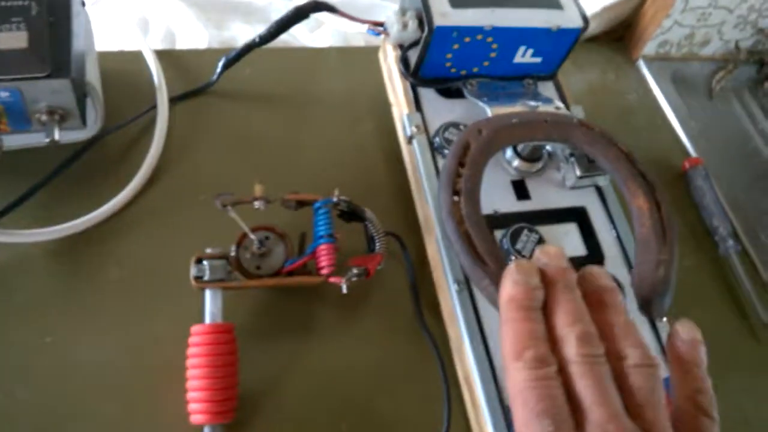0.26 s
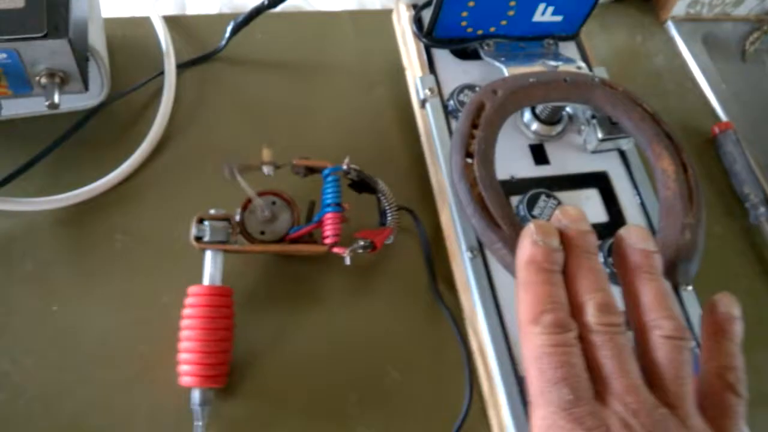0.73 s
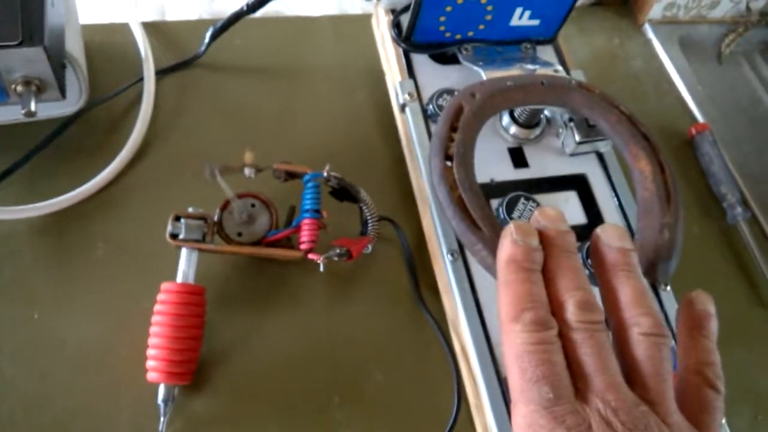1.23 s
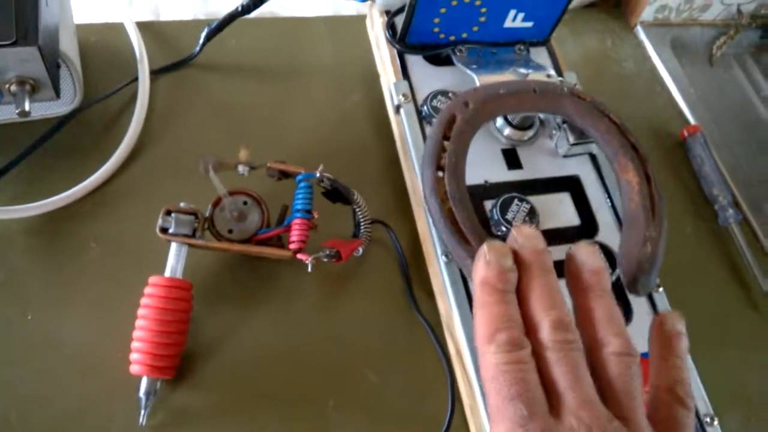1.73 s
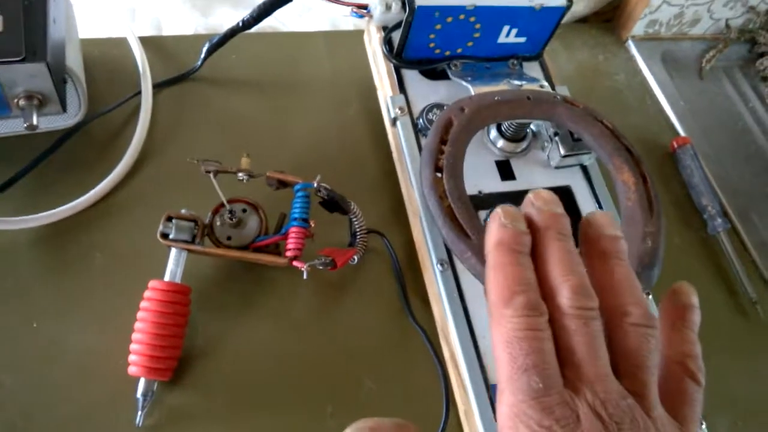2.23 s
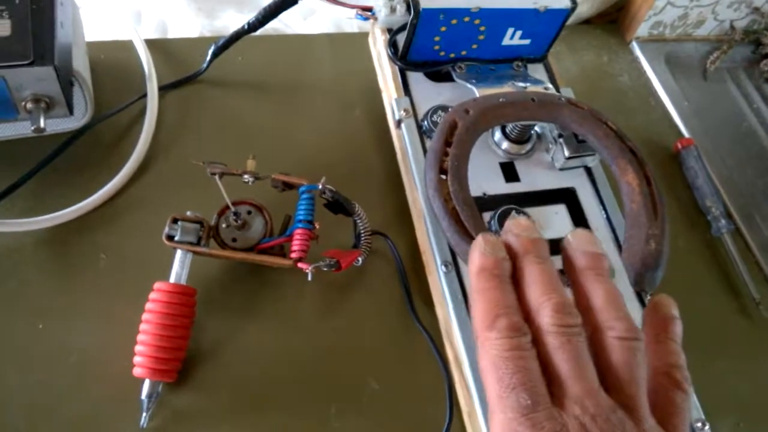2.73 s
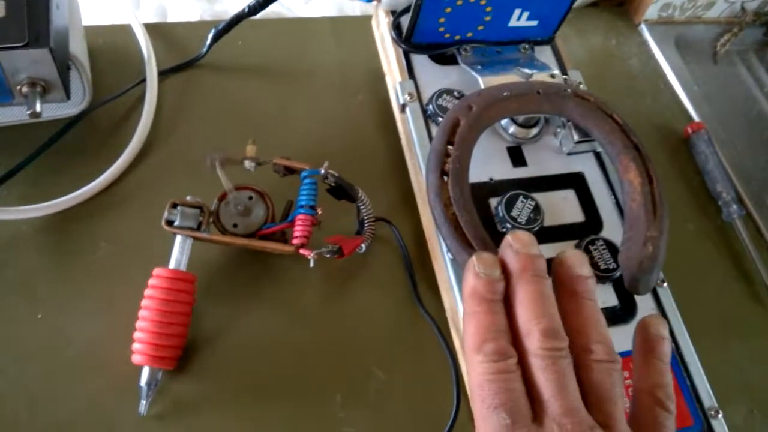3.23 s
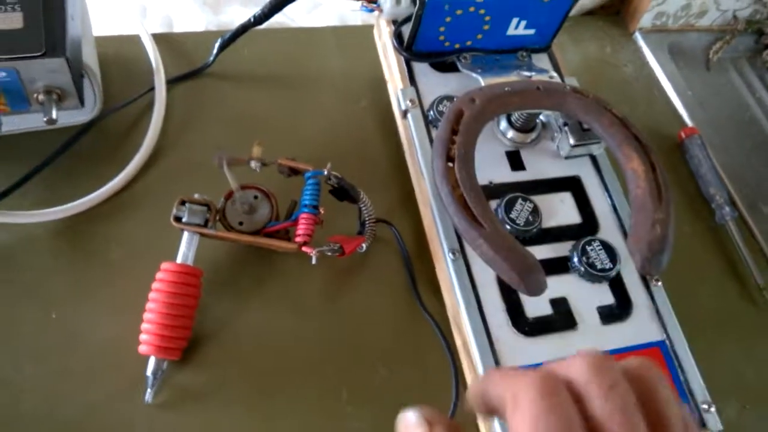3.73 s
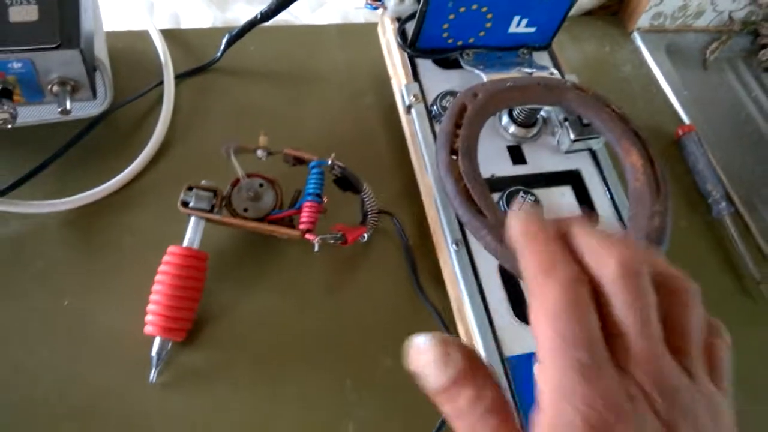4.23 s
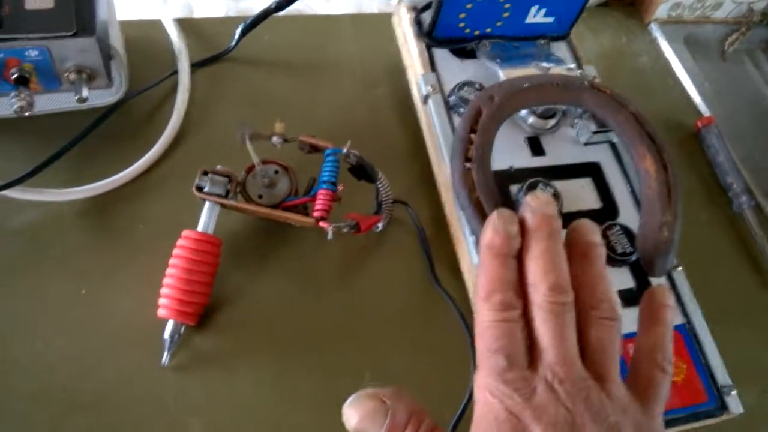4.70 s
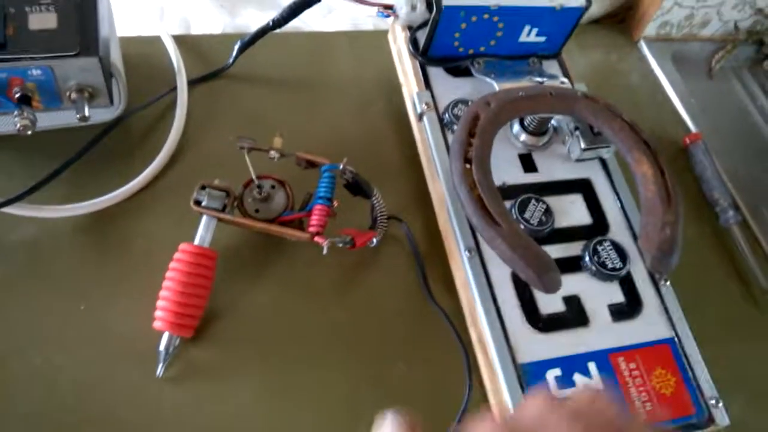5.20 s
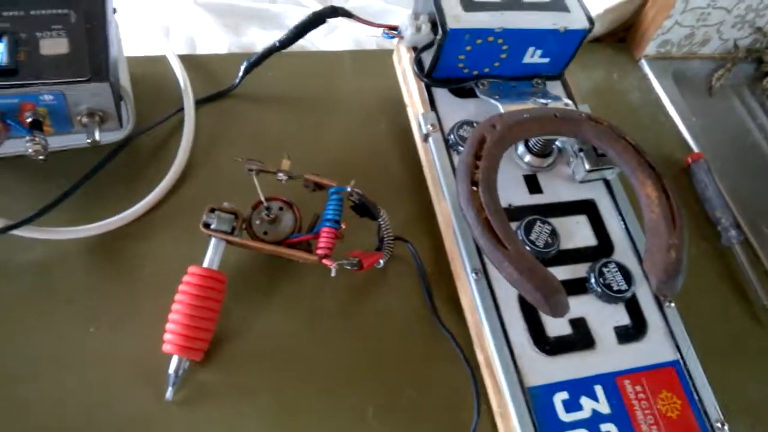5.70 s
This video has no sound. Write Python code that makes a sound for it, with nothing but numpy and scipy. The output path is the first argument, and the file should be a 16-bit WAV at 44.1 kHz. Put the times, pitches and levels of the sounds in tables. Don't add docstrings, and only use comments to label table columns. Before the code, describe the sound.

Twice a pedal clicks and a little motor tool rattles in a low, rough drone against a tabletop, coasts to rest, then small ticks follow.

```python
import sys
import numpy as np
from scipy import signal
from scipy.io import wavfile
from scipy.ndimage import uniform_filter1d

SR = 44100
rng = np.random.default_rng(int(sys.argv[2]) if len(sys.argv) > 2 else 0)


def waveform_to_disk(signal):
    frames = np.transpose(np.atleast_2d(signal))
    scaled = np.clip(frames, -1, 1) * 32767
    samples = np.round(scaled).astype(np.int16)
    wavfile.write(sys.argv[1], SR, samples)


def natural_amplitude(level_db):
    exponent = np.asarray(level_db, float) / 20
    return 10 ** exponent


N = 262395
TIME = np.arange(N) / SR

# (switch-on [s], crank grips [s], switch-off [s], full speed [turns/s]); turn 0 is the grip
PRESSES = [
    (.375, .4714, 2.02, 37.975),
    (3.064, 3.1546, 4.915, 38.01),
]
# (share of turn [1], level [dB], softness [Hz])
TOUCHES = [
    (0, 0, 560),
    (.30, -13, 450),
    (.60, -10, 350),
    (.78, -14, 350),
]
# (from [s], to [s], accent every [turns], accented turn early [ms], accent [dB])
SPELLS = [
    (.74, 1.3, 2, 2.4, 3.2),
    (1.3, 1.5, 2, 1.6, 2),
    (1.5, 2.1, 2, 0, .8),
    (3.25, 3.78, 2, 0, 1.5),
    (3.78, 4.42, 2, 0, .3),
    (3.76, 4.43, 4, 0, 2.5),
]
# (time [s], edge peak [dB], thud [dB])
STANDOUT_BLOWS = [(0.434, -40, -23.5), (0.471, -30, -40), (0.495, -24.5, -22), (0.524, -24, -28),
                  (0.552, -24, -30.5), (0.628, -35, -19.5), (0.68, -33, -18), (0.708, -33, -30),
                  (0.732, -33, -20.5), (1.31, -33.5, -20.5), (1.363, -35, -25), (1.414, -33, -21),
                  (1.467, -33, -25.5), (1.523, -34, -22), (1.573, -32, -22), (1.603, -32, -24),
                  (1.627, -28, -21.5), (1.679, -29, -24), (1.732, -29.5, -21.5), (1.839, -29, -22),
                  (1.891, -31, -21.5), (1.945, -31, -23.5), (1.996, -30.5, -32), (2.055, -40, -25.5),
                  (2.092, -33, -2), (3.209, -30, -17.5), (3.233, -30, -21), (3.336, -31, -25),
                  (3.363, -27.5, -23), (3.418, -28, -22), (3.47, -29, -21), (3.521, -27.5, -24),
                  (3.575, -32, -22), (3.629, -27.5, -25.5), (3.652, -27, -23), (3.679, -28, -24),
                  (3.731, -32, -21), (3.812, -30, -30), (3.837, -24.5, -23), (3.89, -30.5, -21),
                  (3.995, -24, -21.5), (4.099, -34, -20), (4.181, -23, -23), (4.205, -19, 8),
                  (4.287, -32, -28.5), (4.362, -30, -21.5), (4.416, -31, -9), (4.47, -27, -36.5),
                  (4.495, -26, -24), (4.575, -30, -32), (4.6, -30, -22), (4.627, -29, -33),
                  (4.654, -31, -30), (4.704, -28, -21.5), (4.758, -28.5, -26.5), (4.812, -29.5, -49),
                  (4.888, -28.5, -27.5), (4.914, -30, -21.5), (4.943, -31, -19)]
# (time [s], boom [dB], lower board modes [dB])
BEARING = [
    [(.55, -29.5, 1.5), (.75, -30, 4), (.95, -32, -6), (1.25, -32.5, -3.5), (1.4, -30.5, -4),
     (1.6, -28, 1.5), (1.8, -28.5, 0), (1.97, -29.5, 0)],
    [(3.25, -28.5, 3.5), (3.5, -27, 1.5), (3.75, -28, 4), (4.0, -28, 5.5), (4.25, -28.5, 6), (4.45, -29, 1),
     (4.65, -30.5, -1), (4.8, -27.5, 0), (4.9, -30, 3.5)],
]
# (share of full speed [1], boom [dB], knock [dB], rattle [dB])
SPEED_LAW = [(.11, -74, -58, -63), (.25, -43, -75, -36), (.42, -5, -39, -13), (.58, -7, -5.5, -5),
             (.72, 2.1, -2, -2.5), (1.0, -0.5, -0.5, 0.5)]
# (duration [s], from level [dB])
BUILD_UP = [(0.078, -20.5), (0.039, -47), (0.064, -8.5)]
# (frequency [Hz], width [Hz], level [dB])
BOOM_MODES = [(83, 4.4, 5), (107.5, 9.2, 1), (166.6, 1.4, -1), (219, 36, 0.5), (247, 3.9, 5),
              (292.7, 12, 3), (390.8, 24, -9.5), (450, 10, -34), (133.4, 55, 1), (557, 88, -7)]
# (frequency [Hz], width [Hz], level [dB])
KNOCK_MODES = [(656, 37, -9.5), (861.6, 55, -0.5), (1046, 19, -6.5), (1198, 83, -2), (1519, 24, -3.5),
               (1618, 30, -2), (1730, 77, -7), (1866, 21, -3), (2016, 26, -22)]
# (frequency [Hz], width [Hz], level [dB])
SWAY_MODES = [(166.5, 24.6, 7), (257, 43, -34), (303, 8.9, -27), (464, 36, -8.5)]
# (frequency [Hz], width [Hz], level [dB])
FRAME_MODES = [(2180, 350, 14), (2476, 30, 18.5), (2800, 380, 15.5), (3050, 770, 10.5), (4040, 1350, 4.5),
               (5120, 410, 6), (5595, 167, 11), (6150, 45, 17.5), (6840, 730, 12.5), (7460, 126, 17),
               (7990, 280, 8.5), (8440, 210, 6), (9080, 990, 2), (12320, 140, 4), (15600, 1100, -9)]
# (share of turn [1], level [dB])
CROWDING = [(0, 2.5), (.15, 2), (.3, 0), (.45, -1.5), (.58, 1), (.7, -1), (.85, .5), (1, 2.5)]
# (multiple of crank speed [1], level [dB])
GEAR_TONES = [(63, -62), (73, -70)]
# (time [s], peak [dB])
HAND_THUMP = [(0.328, -51)]
# (time [s], peak [dB], low ring [Hz], high ring [Hz], low share [dB])
TICKS = [(0.3753, -35, 2290, 6900, -26), (2.146, -48, 1680, 6900, -22), (3.065, -35.5, 4240, 7600, -12),
         (5.039, -42, 3050, 6500, -5), (5.8126, -33.5, 2140, 9200, 8), (5.8264, -50, 9000, 11500, 0),
         (5.8375, -37, 3670, 6200, -2), (5.8373, -32.5, 3650, 6200, 2), (5.862, -58, 2000, 3500, 6),
         (5.901, -55, 2320, 7000, -14), (5.9374, -53, 1580, 7260, -18)]
# (time [s], peak [dB], length [s])
SCRAPES = [(0.404, -54.5, 0.019), (0.593, -55, 0.021), (1.798, -60, 0.03), (2.013, -60, 0.026),
           (3.11, -58.5, 0.013), (3.333, -57, 0.028), (4.716, -102, 0.03), (4.923, -52, 0.017)]
# (time [s], level [dB], length [s], frequency [Hz])
LOADS = [
    (.5, -45, 0.09, 85),
    (2.15, -51.5, 0.1, 103),
    (5.05, -54, 0.08, 126),
    (5.84, -70, .1, 74),
]
# (time [s], level [dB], length [s], frequency [Hz])
SQUEAKS = [(2.97, -78, .07, 4850), (5.125, -79, 0.07, 4850), (5.89, -82, 0.05, 4950),
           (5.04, -71, 0.1, 3000), (2.19, -74, .07, 2350)]
# (time [s], level [dB], length [s], frequency [Hz])
AFTERSHOCKS = [(2.12, -45, 0.015, 284), (2.155, -52, 0.03, 450), (2.19, -55.5, 0.019, 430),
               (2.19, -49, 0.07, 158), (2.26, -70, 0.033, 450), (5.025, -42, 0.028, 444),
               (5.05, -41, 0.026, 193), (5.045, -56, .015, 810), (5.11, -63, 0.028, 353),
               (5.15, -64, 0.036, 450), (5.22, -70, 0.027, 493)]
# (frequency [Hz], level [dB])
ROOM_SPECTRUM = [(12, -41), (20, -12.5), (65, -8), (326, -29), (510, -31.5), (713, -33.5), (1020, -32),
                 (1950, -34), (2880, -37), (3700, -38.5), (15800, -44.5)]

ROOM_DB = -61.5
KNOCK_DB, KNOCK_FOLLOWS, RATTLE_DB = -42, 0.2, -47.5
LABOUR_SHARE, COAST_S, COAST_OUT_S = .71, .135, .29
SPELL_EDGE_S, FREE_DB, SETTLING = .12, 2.0, .38
SLOW_GATE_DB, SLOW_GATE_TURN = 8.5, 0.28
BLOW_LEAD_S, LANDING_LEAD_S = .001, .0027
STRIKE_LAG_S, SETTLE_LAG_S, SETTLE_S = .001, (.0008, .0018), .3
LANDING_DB, LANDING_PER_ACCENT, LANDING_PER_THUD = -11, 3.56, 2.4
SLAM_DB = -2
EDGE_AT_DB, THUD_AT_DB, BLOW_DELAY_S = -24.5, -21.5, 0.00086
WEAK_THUD_DB = -6
CHATTER_S, CHATTER_DB = 0.003986, -7.5
ROCK_S, ROCK_DB, SLOW_ROCK_DB, ROCK_FREEDOM = 0.003904, -22, 10.5, 4.53
HUM_HZ, HUM_WIDTH_HZ, HUM_DB = 270.4, 53, -10.5
THUD_DB, SHAKE_DB = -6, -6
PATCHY_DB, PATCHY_HZ = 1.2, 9
TICK_TAIL_DB, TICK_T60_S = -24, 0.12
RELEASE_DB, RELEASE_S = -48.5, 0.033


def machine():
    angle, (boom_db, knock_db, rattle_db) = running_state()
    dull, sharp = table_blows()
    running = natural_amplitude(rattle_db + 48)
    shake = rng.standard_normal(N) * np.sqrt(running)
    hardness = natural_amplitude(np.clip(knock_db - boom_db + 14, -12, 2))
    boom = table_boom(dull, shake, running, hardness)
    knock = butter(body(sharp + natural_amplitude(SHAKE_DB) * sharp.std() * shake, KNOCK_MODES), 550, "high")
    mesh = gear_tones(angle, running)
    rattle = frame_rattle(angle)
    return levelled(boom, boom_db) + levelled(knock, knock_db) + levelled(rattle, rattle_db) + mesh


def crank(on, grip, off, full):
    s = TIME[(TIME >= on) & (TIME < off + COAST_OUT_S)]
    coast = np.exp(-np.maximum(s - off, 0) / COAST_S)
    driven = np.where(s < grip, LABOUR_SHARE, 1) * (np.minimum(s, off) - grip)
    turns = full * (driven + COAST_S * (1 - coast))
    return s, turns, np.where(s < grip, LABOUR_SHARE, coast)


def running_state():
    angle, levels = np.zeros(N), np.full((3, N), -120.)
    share, *law = np.transpose(SPEED_LAW)
    for press, bearing in zip(PRESSES, BEARING):
        s, done, speed = crank(*press)
        here = np.round(s * SR).astype(int)
        speed = uniform_filter1d(speed, size=900, mode="nearest")
        boom_db = np.interp(s, *np.transpose(bearing)[:2])
        knock_db = KNOCK_DB + KNOCK_FOLLOWS * (boom_db - boom_db.mean())
        full_db = boom_db, knock_db, RATTLE_DB
        angle[here] = done
        for k, (rise, from_db) in enumerate(BUILD_UP):
            growth_db = from_db * np.clip(1 - (s - s[0]) / rise, 0, 1)
            levels[k, here] = full_db[k] + np.interp(speed, share, law[k]) + growth_db
        gate = np.cos(2 * np.pi * (done - SLOW_GATE_TURN))
        levels[2, here] += SLOW_GATE_DB * (s > press[2]) * (1 - speed) * gate
    return angle, levels


def table_blows():
    dull, sharp = np.zeros((2, N))
    for press, settle in zip(PRESSES, SETTLE_LAG_S):
        s, done, speed = crank(*press)
        turn = np.arange(np.ceil(done[0]), done[-1] - 1e-3)
        turn_s = np.interp(turn, done, s)
        early_ms, accent_db, uneven_db = bounce(turn, turn_s)
        slow = 1 - np.interp(turn, done, speed)
        listed, listed_s, edge_db, thud_db = standouts(turn_s)
        luck = rng.standard_normal((len(turn), len(TOUCHES), 7))
        for k, (share, db, soft_hz) in enumerate(TOUCHES):
            lead = k < 2
            slip_ms = lead * uneven_db * luck[:, k, 0] / 20
            at = np.interp(turn + share, done, s) + 1e-3 * slip_ms
            at = at + STRIKE_LAG_S + settle * np.exp(-np.maximum(at - press[1], 0) / SETTLE_S)
            size = natural_amplitude(db + 1.6 * uneven_db * luck[:, k, 1]) * (turn + share < done[-1])
            if k == 0:
                free_db = LANDING_DB + LANDING_PER_ACCENT * accent_db + 2.3 * uneven_db * luck[:, 1, 3]
                weight = natural_amplitude(np.minimum(np.where(listed, LANDING_PER_THUD * thud_db, free_db), 3))
                dull += landing(at, early_ms, weight)
                size = size * natural_amplitude(-1.1 * early_ms - 0.78 * np.abs(accent_db) * (early_ms == 0))
                size = size * natural_amplitude(listed * np.minimum(thud_db - WEAK_THUD_DB, 0))
            thud_s = at - BLOW_LEAD_S
            dull += butter(clicks(thud_s, size), soft_hz, "low") * 900 / soft_hz
            freedom_db = uneven_db * (ROCK_FREEDOM + 2.0 * luck[:, k, 6])
            rock = lead * size * natural_amplitude(np.minimum(ROCK_DB + SLOW_ROCK_DB * slow + freedom_db, 1))
            for swing in (1, 2):
                dull += butter(clicks(thud_s + swing * ROCK_S, rock / swing), 378, "low") * 6.8
            size = size * natural_amplitude(-18 * slow)
            if k == 0:
                sharp += butter(clicks((listed_s + at - .001) / 2, listed * natural_amplitude(edge_db + 10.0)), 1000, "low")
                size = np.where(listed, natural_amplitude(edge_db - 60), size * natural_amplitude(-1.0))
            catch_db = 2 * (k > 0) - 1.2 * early_ms + (1 + .7 * uneven_db) * luck[:, k, 2]
            sharp += butter(clicks(at + 2e-4 * luck[:, k, 3], size * natural_amplitude(catch_db)), 1100, "low")
            again = at + CHATTER_S * (1 + 0.13 * luck[:, k, 4])
            sharp += butter(clicks(again, size * natural_amplitude(CHATTER_DB + 3.6 * luck[:, k, 5])), 1200, "low")
    return dull, sharp


def landing(at, early_ms, weight):
    lands = at - BLOW_LEAD_S - LANDING_LEAD_S - 1e-3 * early_ms
    recoil = clicks(lands + 0.0014, weight * natural_amplitude(SLAM_DB - 2.0 * early_ms))
    return butter(clicks(lands, weight) - recoil, 420, "low") * 1.75


def bounce(turn, at):
    early_ms, accent_db, held_db = np.zeros((3, len(turn)))
    for start, end, every, ms, db in SPELLS:
        inside = np.clip(np.minimum(at - start, end - at) / SPELL_EDGE_S + .5, 0, 1)
        marked = turn % every == 0
        early_ms += inside * ms * marked
        accent_db += inside * db * np.where(marked, 1, -1 / (every - 1))
        held_db += inside * db
    return early_ms, accent_db, FREE_DB - SETTLING * held_db


def standouts(at):
    s, edge_db, thud_db = np.transpose(STANDOUT_BLOWS)
    contact_s = s + BLOW_DELAY_S
    near = np.abs(at[:, None] - contact_s).argmin(axis=1)
    listed = np.abs(at - contact_s[near]) < .009
    return listed, contact_s[near], edge_db[near] - EDGE_AT_DB, thud_db[near] - THUD_AT_DB


def table_boom(dull, shake, running, hardness):
    ringing = rms_one(body(dull + natural_amplitude(-8) * dull.std() * shake, BOOM_MODES, sign=1))
    ringing = ringing + natural_amplitude(HUM_DB) * rms_one(resonate(dull, HUM_HZ, HUM_WIDTH_HZ))
    sway_noise = 2 * dull.std() * running ** 0.097 * rng.standard_normal(N)
    sway = rms_one(body(dull + sway_noise, SWAY_MODES))
    thud = rms_one(butter(dull, [200, 560], "band"))
    boom = np.sqrt(hardness) * ringing + natural_amplitude(THUD_DB) * hardness * thud + natural_amplitude(-8) * sway / np.sqrt(hardness)
    boom = butter(boom, [48, 680], "band")
    s, _, lower_db = np.transpose(BEARING[0] + BEARING[1])
    bearing_gain = natural_amplitude(np.interp(TIME, s, lower_db))
    return boom + (bearing_gain - 1) * resonate(boom, 222, 87)


def frame_rattle(angle, looped_db=-0.5, grains_per_s=7000, spread_db=5.5):
    shares, out = rng.random(40), np.zeros(N)
    crowd = natural_amplitude(np.interp(angle % 1, *np.transpose(CROWDING)))
    for modes in (FRAME_MODES[:4], FRAME_MODES[4:8], FRAME_MODES[8:11], FRAME_MODES[11:]):
        contact_db = 3 * rng.standard_normal(40)
        looped = np.zeros(N)
        for press in PRESSES:
            s, done, _ = crank(*press)
            where = np.arange(np.floor(done[0]), done[-1])[:, None] + shares
            luck = rng.standard_normal((2,) + where.shape)
            moving = (where > done[0]) * (where < done[-1])
            at = np.interp(where, done, s) + 5e-5 * luck[0]
            looped += clicks(at, natural_amplitude(contact_db + 1.0 * luck[1]) * moving)
        grain_db = np.clip(spread_db, 0, 3) * np.minimum(rng.exponential(1, N), 4)
        sizes = natural_amplitude(grain_db) * rng.choice([-1, 1], N)
        loose = (rng.random(N) < grains_per_s / SR) * sizes
        patches = natural_amplitude(PATCHY_DB * rms_one(butter(rng.standard_normal(N), PATCHY_HZ, "low")))
        out += body(patches * crowd * (natural_amplitude(looped_db) * rms_one(looped) + rms_one(loose)), modes)
    return out


def gear_tones(angle, running):
    wobble = rms_one(butter(rng.standard_normal(N), 0.49, "low", order=1))
    return sum(natural_amplitude(db + 3) * running * np.sin(2 * np.pi * k * angle + wobble) for k, db in GEAR_TONES)


def pedal():
    out = contact_ticks() + pedal_friction()
    out += swells(LOADS, cycles=1.07) + swells(SQUEAKS, cycles=24.0) + swells(AFTERSHOCKS, cycles=4.4)
    for s, db in HAND_THUMP:
        age = np.clip(TIME - s, 0, 1)
        thump = rms_one(butter(rng.standard_normal(N), [430, 680], "band"))
        out += natural_amplitude(db - 2.5 - 60 * age / 0.085) * (TIME >= s) * thump
    return out


def contact_ticks():
    out = np.zeros(N)
    for s, db, low_hz, high_hz, low_db in TICKS:
        age = np.clip(TIME - s, 0, 1)
        decay = natural_amplitude(-60 * age / .003) + natural_amplitude(TICK_TAIL_DB - 60 * age / TICK_T60_S)
        burst = (TIME >= s) * decay * rng.standard_normal(N)
        tick = butter(burst, [2500, 9000], "band") * .4
        tick = tick + natural_amplitude(low_db + 9) * resonate(burst, low_hz, 700)
        tick = tick + 2.6 * resonate(burst, min(high_hz, 15000), 1100)
        tick = butter(tick, 1300, "high")
        out += natural_amplitude(db + 1) * tick / np.abs(tick).max()
    return out


def pedal_friction():
    out = np.zeros(N)
    bright = butter(rng.standard_normal(N), 8500, "high")
    hiss = rms_one(bright + 3.3 * butter(rng.standard_normal(N), 3000, "high"))
    for s, db, length in SCRAPES:
        out += natural_amplitude(db + 5.5) * np.exp(-((TIME - s - length / 2) / (length / 2)) ** 2) * hiss
    rasp = rms_one(butter(rng.standard_normal(N), [2800, 6500], "band"))
    for on, grip, off, full in PRESSES:
        out += natural_amplitude(RELEASE_DB) * np.exp(-((TIME - off - .01) / RELEASE_S * 2) ** 2) * rasp
    return out


def swells(rows, cycles):
    noise, out = rng.standard_normal(N), np.zeros(N)
    for s, db, length, hz in rows:
        ring = resonate(resonate(noise, hz, hz / cycles), hz, hz / cycles)
        out += natural_amplitude(db) * np.exp(-((TIME - s) / length * 2) ** 2) * rms_one(ring)
    return out


def reverb(x, t60=0.24):
    age = np.arange(round(.5 * SR)) / SR
    tail = butter(rng.standard_normal(len(age)), 980, "low", order=1) * natural_amplitude(-60 * age / t60) * (age > .004)
    return signal.fftconvolve(x, tail / np.sqrt(np.sum(tail ** 2)))[:N]


def room_tone():
    out, edges = 0, 20 * 2 ** np.arange(0, 10.1, .5)
    white = rng.standard_normal((2, N))
    hz, level_db = np.transpose(ROOM_SPECTRUM)
    for k, (low, high) in enumerate(zip(edges, np.minimum(edges[1:], 19000))):
        gain = natural_amplitude(np.interp(np.log(low * high) / 2, np.log(hz), level_db))
        out = out + gain * butter(white[k % 2], [low, high], "band")
    return natural_amplitude(ROOM_DB) * rms_one(out)


def rms_one(x):
    return x / np.sqrt(np.mean(x ** 2) + 1e-20)


def butter(x, hz, kind, order=2):
    return signal.sosfilt(signal.butter(order, hz, kind, fs=SR, output="sos"), x)


def resonate(x, hz, width):
    r = np.exp(-np.pi * width / SR)
    poles = [1, -2 * r * np.cos(2 * np.pi * hz / SR), r * r]
    return signal.lfilter(np.array([1, 0, -1]) * (1 - r * r) / 2, poles, x + 1e-18)


def body(x, modes, sign=-1):
    return sum(sign ** k * natural_amplitude(db) * resonate(x, hz, width) for k, (hz, width, db) in enumerate(modes))


def clicks(times, sizes):
    out = np.zeros(N)
    np.add.at(out, np.clip(np.round(np.ravel(times) * SR).astype(int), 0, N - 1), np.ravel(sizes))
    return out


def levelled(x, level_db):
    power = uniform_filter1d(uniform_filter1d(x ** 2, size=4640), size=2320)
    return natural_amplitude(level_db) * x / np.sqrt(power + 0.0033 * np.mean(x ** 2))


def scene():
    near = machine() + pedal()
    return (near + natural_amplitude(-19) * reverb(near) + room_tone())[None]


def roll_off(x):
    return signal.sosfilt(signal.butter(12, 16440, fs=SR, output="sos"), x)


def record(dry):
    low_pass = signal.cheby2(12, 60, 16730, fs=SR, output="sos")
    mix = signal.sosfilt(low_pass, dry)
    return roll_off(mix)


dry = scene()
out = record(dry)
waveform_to_disk(out)
```